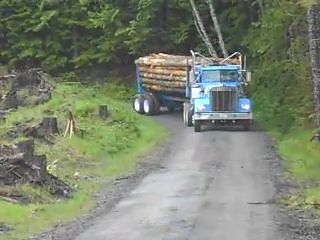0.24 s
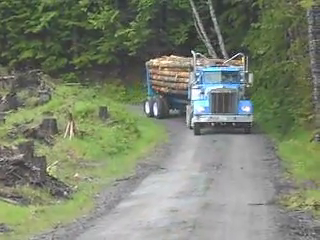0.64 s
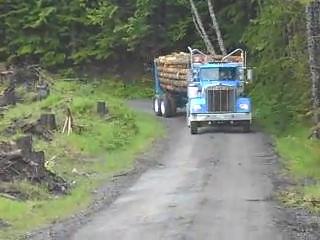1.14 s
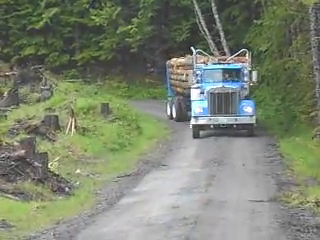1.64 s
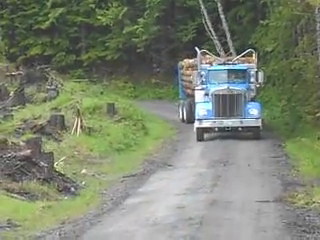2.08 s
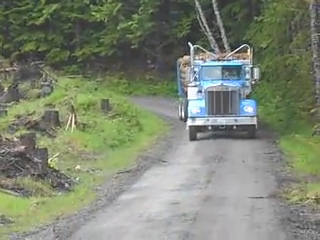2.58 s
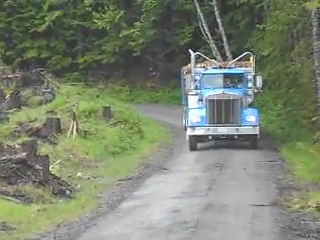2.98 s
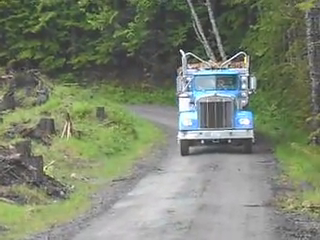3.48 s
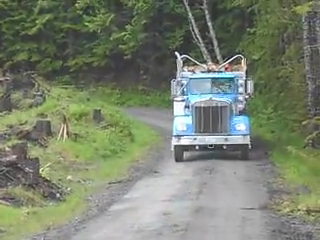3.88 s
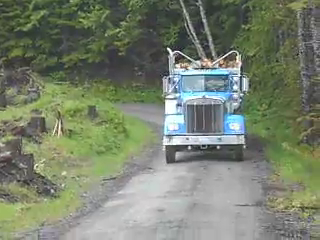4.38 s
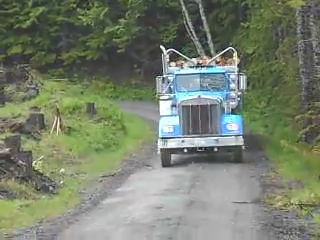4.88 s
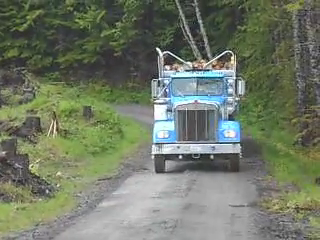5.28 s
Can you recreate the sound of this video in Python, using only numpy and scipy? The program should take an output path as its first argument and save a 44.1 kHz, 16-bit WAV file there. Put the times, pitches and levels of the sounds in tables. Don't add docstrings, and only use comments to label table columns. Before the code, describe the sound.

A heavy six-cylinder diesel truck approaches on a forest gravel road under engine brake. Uneven exhaust bursts boom and rasp from the first moment, with metallic clatter, gas roar and thin gravel hiss. Bright sounds dull around the middle and return; the pulse gradually slows, then quickens slightly near the end. Outdoors, small mono camera microphone, slightly gritty treble.

```python
import sys
import numpy as np
from scipy import signal
from scipy.fft import rfft, irfft
from scipy.io import wavfile
from scipy.ndimage import uniform_filter1d, map_coordinates

SR = 44100
rng = np.random.default_rng(int(sys.argv[2]) if len(sys.argv) > 2 else 0)


def invert_db(x):
    u = np.asarray(x, float) / 20
    return 10 ** u


def store_wav(level_fs):
    pcm = np.round(np.clip(np.atleast_2d(level_fs), -1, 1) * 32767)
    wavfile.write(sys.argv[1], SR, pcm.T.astype(np.int16))


N = 243873
TIME = np.arange(N) / SR


def level(x, db):
    return x * invert_db(db) / np.sqrt(np.mean(x ** 2))


def colour(x, shape):
    hz, db = np.transpose(shape)
    bins = np.maximum(np.arange(N // 2 + 1) * SR / N, 1)
    gain_db = np.interp(np.log(bins), np.log(hz), db)
    return irfft(rfft(x) * invert_db(gain_db), N)


def walk(rate_hz):
    size = int(SR / rate_hz)
    held = np.repeat(rng.standard_normal(N // size + 1), size)
    return uniform_filter1d(uniform_filter1d(held, size), size)[:N]


def echo(x, far_ms, near_ms, far, near):
    lag_ms = np.linspace(far_ms, near_ms, N)
    late = np.interp(TIME - lag_ms / 1000, TIME, x)
    return x + np.linspace(far, near, N) * late


# time in seconds, crank speed in rpm.
CRANK_SPEED = [(0.0, 1545.0), (0.33, 1561.6), (0.68, 1522.4), (1.01, 1548.8), (1.62, 1548.5),
               (1.86, 1523.3), (2.28, 1535.4), (2.73, 1493.8), (3.06, 1496.8), (3.44, 1462.5),
               (3.79, 1449.4), (4.17, 1404.2), (4.96, 1396.5), (5.02, 1400.2), (5.28, 1435.5),
               (5.53, 1433.8)]


def cam_turns():
    rpm = np.interp(TIME, *np.transpose(CRANK_SPEED))
    return -.409 + np.cumsum(rpm) / (120 * SR)


# time in seconds, gain in dB.
OPEN_PATH = [(0, -0.5), (.7, -.5), (1.4, 1.5), (2.1, 0.4), (2.27, -2), (2.8, -4), (3.02, -3), (3.13, 0),
             (3.6, -1.1), (3.9, 1.5), (4.2, 1.2), (4.55, 0), (4.75, 2), (5.1, 2.5), (5.3, 1), (5.53, 2)]


def open_path():
    return np.interp(TIME, *np.transpose(OPEN_PATH))


# lag through the manifold in ms, boom strength 0-1, bark strength 0-1.
CYLINDERS = [
    (0, 1, 1),
    (-1.8, .1, .04),
    (-.06, .48, .88),
    (-.85, .44, .36),
    (.18, .65, .82),
    (-3, .04, 0),
]


def releases(turns, strength, lead_ms, scatter_db, jitter_ms):
    shot = np.arange(int(6 * turns[0]), int(6 * turns[-1]) + 1)
    cylinder = shot % 6
    time_chance, size_chance = rng.standard_normal((2, len(shot)))
    lag_ms = np.array(CYLINDERS)[cylinder, 0] - lead_ms + jitter_ms * time_chance
    place = (np.interp(shot / 6, turns, TIME) + lag_ms / 1000) * SR
    place = np.clip(place, 0, N - 2)
    size = strength[cylinder] * invert_db(scatter_db * size_chance)
    whole = place.astype(int)
    part = place - whole
    return np.bincount(whole, size * (1 - part), N) + np.bincount(whole + 1, size * part, N)


BENDS = [
    0,
    1.8,
    3.4,
    4.2,
    5.53,
]


def ring(pulses, modes):
    out = np.zeros(N)
    for hz, width, *gains in modes:
        tone = signal.lfilter(*signal.iirpeak(hz, hz / width, fs=SR), pulses)
        out += np.interp(TIME, BENDS, gains) * tone
    return out


# time in seconds, half length in seconds, extra share of the
CHEST_SWELLS = [
    (3.003, .5, .15),
    (3.75, 0.27, .33),
    (4.7, .3, -.2),
    (5.3, 0.15, 0.6),
]


def chest_swells():
    return sum(share * np.exp(-((TIME - s) / half) ** 2) for s, half, share in CHEST_SWELLS)


# frequency in Hz, width in Hz, then signed gain at each of the five bends.
STACK_MODES = [(41.3, 20.2, 0.077, 0.079, 0.136, 0.215, 0.234),
               (59.9, 132.9, -0.073, -0.072, -0.1, -0.2, -0.194),
               (80.5, 21.6, 0.095, 0.171, 0.162, 0.213, 0.172),
               (95.1, 30.9, -0.306, -0.45, -0.378, -0.491, -0.416),
               (131.4, 72.5, 0.8, 0.874, 0.908, 0.973, 1.0),
               (184.4, 20.5, -0.379, -0.34, -0.536, -0.398, -0.379),
               (227.7, 30.2, -0.639, -0.807, -0.597, -0.455, -0.682),
               (262.3, 30.4, -0.401, -0.391, -0.29, -0.445, -0.31),
               (313.8, 23.6, -0.168, -0.161, -0.063, -0.301, -0.398),
               (320.7, 23.6, 0.273, 0.258, 0.096, 0.34, 0.41),
               (385.0, 43.7, -0.094, -0.117, -0.07, -0.086, -0.08),
               (399.1, 38.1, 0.128, 0.125, 0.03, 0.046, 0.04),
               (529.7, 65.7, 0.025, 0.016, -0.0, 0.004, -0.014)]


def stack_boom(turns):
    strength = np.array(CYLINDERS)[:, 1]
    pulses = releases(turns, strength, lead_ms=3.98, scatter_db=.5, jitter_ms=.03)
    boom = echo(ring(pulses, STACK_MODES), 43.8, 46.8, .054, .21)
    boom = colour(boom, [(20, -6), (30, 0), (500, 0), (620, -20)])
    chest = colour(boom, [(25, -5.5), (60, -5), (88, -3.5), (120, 4.5), (140, -26.5)])
    swell = chest_swells()
    return level(boom + swell * chest, -23.552) * invert_db(-3 * swell)


# frequency in Hz, width in Hz, then signed gain at each of the five bends.
OUTLET_MODES = [(527.0, 187.3, -0.06, -0.082, -0.064, -0.051, -0.026),
                (554.9, 35.8, 0.072, 0.196, 0.028, 0.08, 0.075),
                (655.3, 45.2, -0.05, 0.121, -0.003, 0.042, 0.119),
                (746.0, 35.0, -0.161, 0.044, 0.034, -0.133, -0.141),
                (779.8, 124.4, -0.045, -0.068, -0.01, 0.396, 0.307),
                (853.7, 42.5, -0.181, -0.565, -0.678, -0.971, -1.0),
                (904.2, 86.0, 0.023, 0.119, 0.311, -0.006, 0.06),
                (942.7, 113.4, 0.04, -0.006, -0.135, 0.02, 0.035),
                (996.7, 473.5, 0.057, 0.037, 0.055, -0.094, -0.11),
                (1101.1, 35.0, -0.069, 0.003, -0.01, 0.056, 0.076)]


def outlet_bark(turns):
    strength = np.array(CYLINDERS)[:, 2]
    pulses = releases(turns, strength, lead_ms=2.95, scatter_db=1.2, jitter_ms=.03)
    bark = echo(ring(pulses, OUTLET_MODES), 2.79, 3.03, .4, .6)
    bark = colour(bark, [(430, -25), (530, 0), (1120, 0), (1350, -16)])
    return level(bark, -39)


def locked(turns, memory, steps=1800):
    pattern = rng.standard_normal((90, steps))
    for _ in range(2):
        pattern = uniform_filter1d(pattern, size=memory, axis=0)
    row = turns - np.floor(turns[0])
    return level(map_coordinates(pattern, [row, row % 1 * steps], order=3, mode="grid-wrap"), 0)


def puffs(turns, depth, decay_ms):
    keep = np.exp(-1000 / (decay_ms * SR))
    strength = np.array(CYLINDERS)[:, 2]
    kicks = releases(turns, strength, lead_ms=2.8, scatter_db=.82, jitter_ms=.13)
    return 1 + depth * signal.lfilter([1], [1, -keep], kicks)


# frequency in Hz, level in dB per Hz.
RASP_COLOUR = [(420, -33), (550, -9.5), (640, 1.5), (740, 4.5), (860, 1.5), (1000, 1.5), (1120, -5.5),
               (1300, -28)]


def outlet_rasp(turns, path_db):
    gas = locked(turns, memory=8) * puffs(turns, depth=.6, decay_ms=5)
    corner_db = -3.5 * np.clip(1 - TIME / .52, 0, 1)
    gain_db = .6 * path_db + corner_db + np.linspace(.8, -1.5, N)
    return level(colour(gas, RASP_COLOUR), -38.5) * invert_db(gain_db)


# frequency in Hz, level in dB per Hz.
GEAR_COLOUR = [(800, -9.5), (1100, -7), (1300, -4.5), (1550, 0), (1800, -3), (2000, -6.5), (2250, 0),
               (2500, -7.5), (2850, -18), (3700, -23.5), (4100, -31.5), (4500, -20), (6000, -40)]


def valve_gear(turns, path_db):
    loose = rng.standard_normal(N) * invert_db(2.6 * walk(40))
    taps = locked(turns, memory=6) + .9 * loose
    clatter = colour(taps * puffs(turns, depth=np.linspace(1.5, .2, N), decay_ms=1.5), GEAR_COLOUR)
    high = colour(clatter, [(1800, -42), (2100, -0.5)])
    clatter = clatter + np.linspace(.25, -.35, N) * high
    return level(clatter, -42) * invert_db(.92 * path_db)


# frequency in Hz, level in dB per Hz.
ROAR_COLOUR = [(25, -32), (60, -20), (110, -7), (220, 0), (290, -2), (350, -14), (480, -19), (720, -5),
               (860, -7), (1100, -11), (1300, -22), (1700, -40)]


def gas_roar(turns):
    throb_db = 1.5 * np.cos(6 * np.pi * turns) + walk(15)
    return level(colour(rng.standard_normal(N) * invert_db(throb_db), ROAR_COLOUR), -38.5)


# frequency in Hz, level in dB per Hz.
GRAVEL_COLOUR = [(1500, -7.5), (3000, -13.5), (5500, -7.5), (7200, 2), (8000, 5.5), (8700, -4.5),
                 (10200, 5), (14000, -2.5)]


def tyres(path_db):
    grit = rng.standard_normal(N) * invert_db(1.3 * walk(24))
    nearer_db = .49 * TIME
    return level(colour(grit, GRAVEL_COLOUR), -56.3) * invert_db(1.6 * path_db + nearer_db)


def scene():
    turns = cam_turns()
    path_db = open_path()
    exhaust = stack_boom(turns) + outlet_bark(turns) + outlet_rasp(turns, path_db)
    engine = valve_gear(turns, path_db) + gas_roar(turns)
    return (exhaust + engine + tyres(path_db))[None]


def top_cut(x):
    return signal.sosfilt(signal.butter(12, 12200, fs=SR, output="sos"), x)


def record(dry):
    half = signal.resample_poly(dry, 1, 2, axis=1)
    half = signal.lfilter([.5, 0, .5], [1], half)
    edge_pole = 0.9
    half = signal.lfilter([1, 1], [1, edge_pole], half) * (1 + edge_pole) / 2
    full = np.zeros_like(dry)
    full[:, ::2] = 2 * half
    slope = [(100, 1.5), (10600, 0), (11400, -7.5), (11900, -20.5), (12350, -36.5), (12600, -50)]
    mix = colour(full[0], slope)[None]
    return top_cut(mix)


dry = scene()
out = record(dry)
store_wav(out)
```